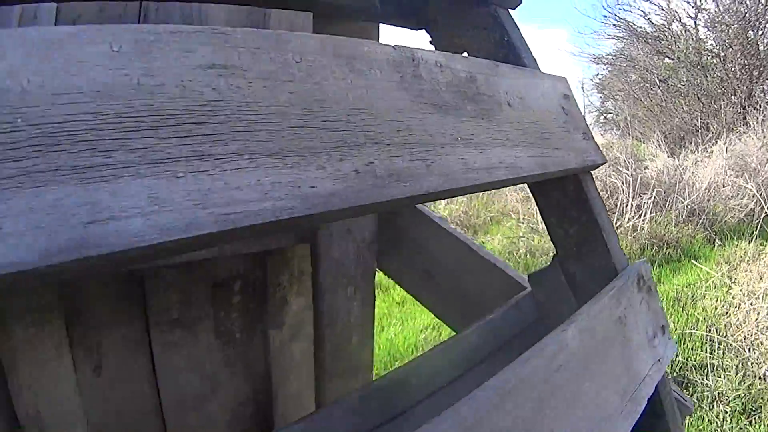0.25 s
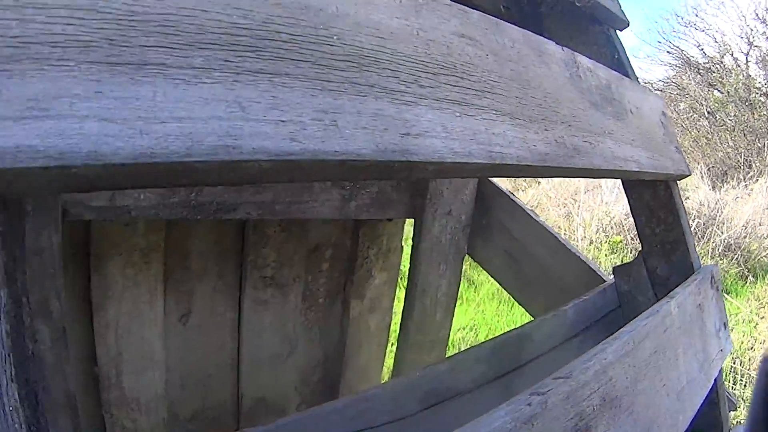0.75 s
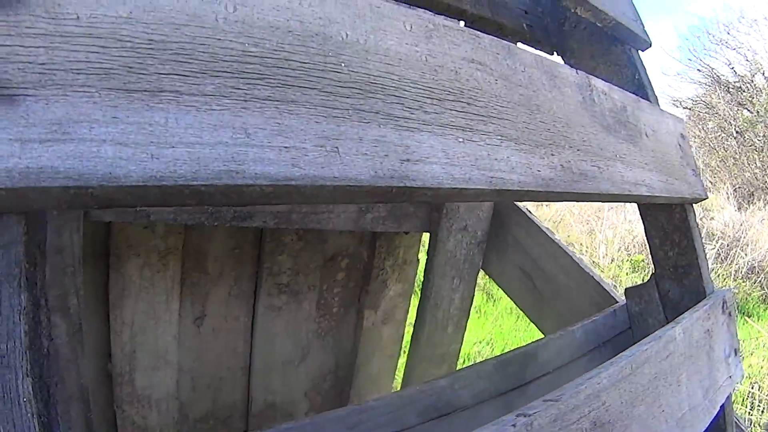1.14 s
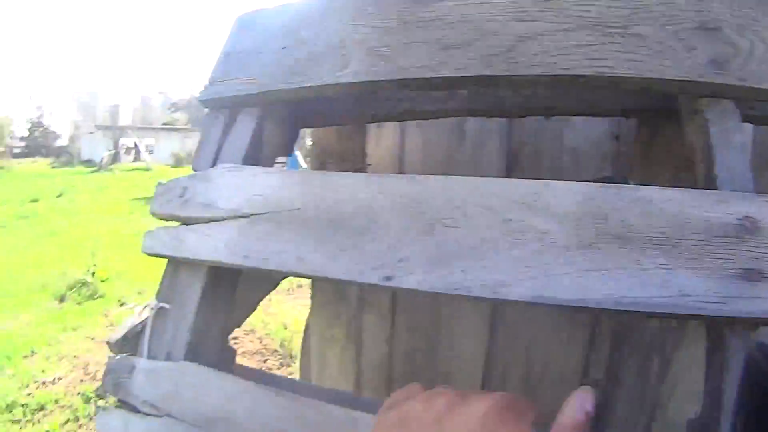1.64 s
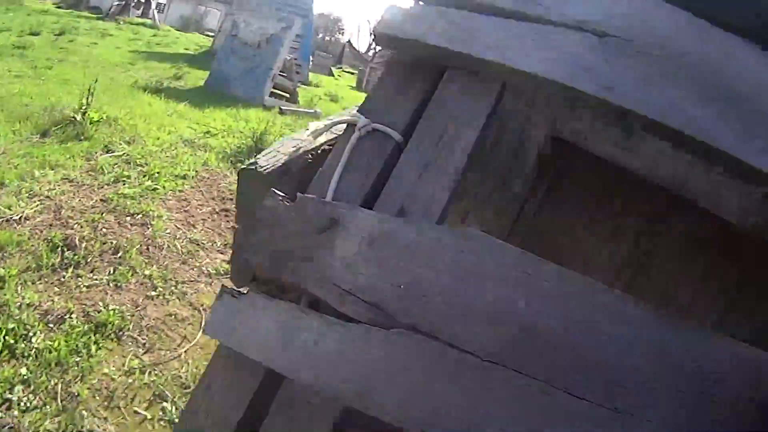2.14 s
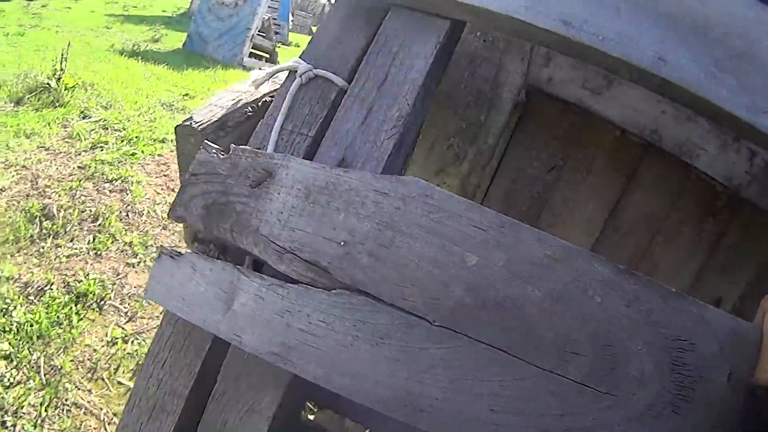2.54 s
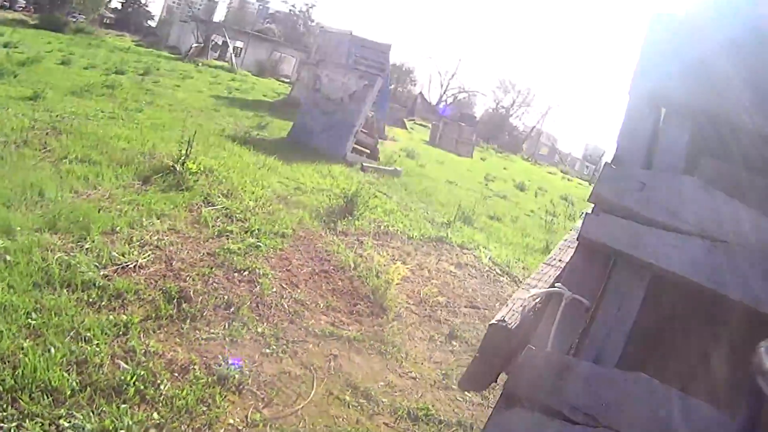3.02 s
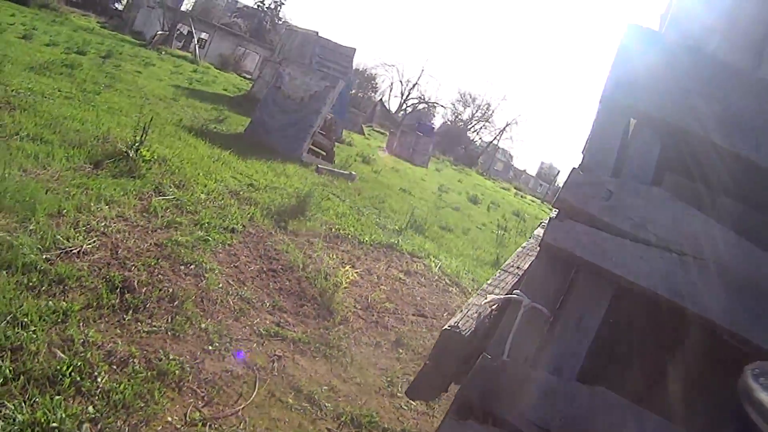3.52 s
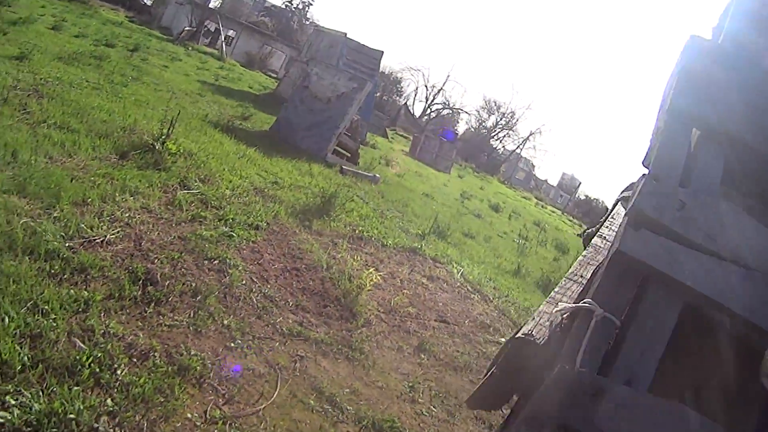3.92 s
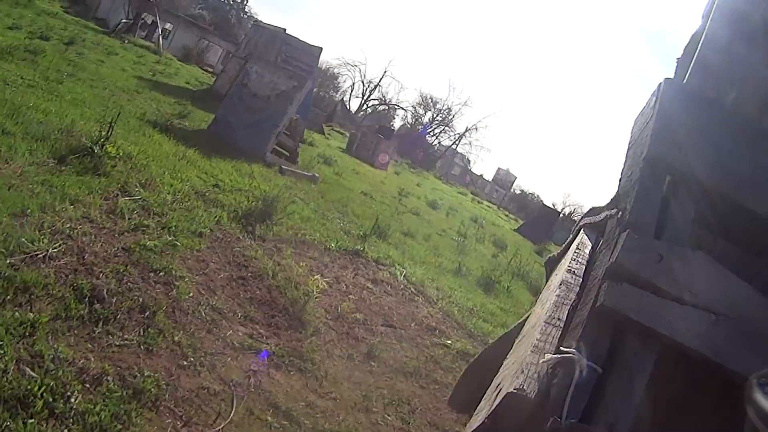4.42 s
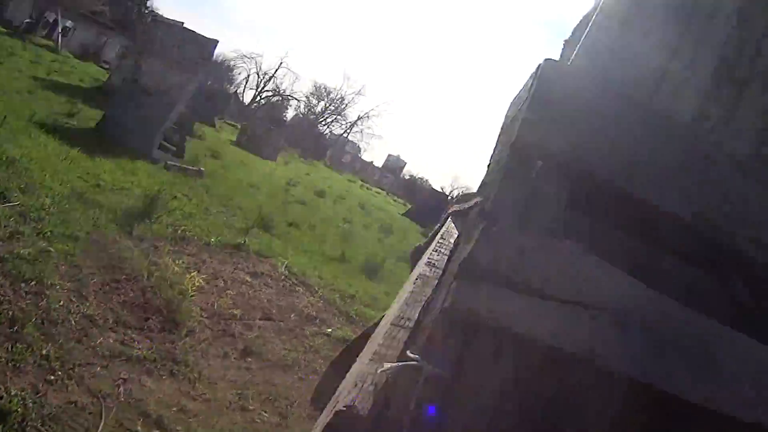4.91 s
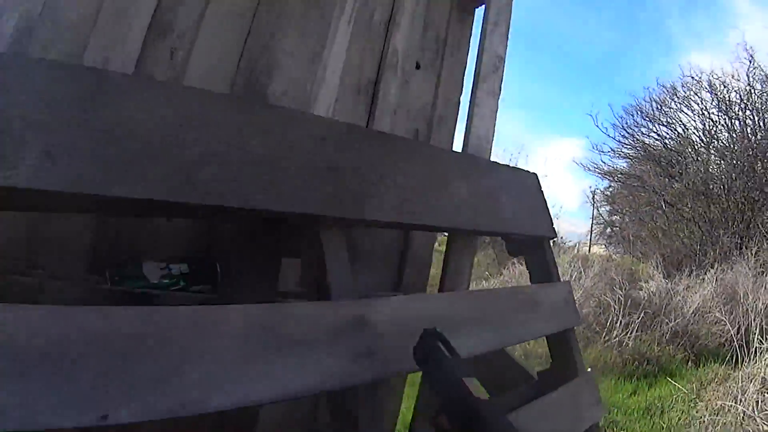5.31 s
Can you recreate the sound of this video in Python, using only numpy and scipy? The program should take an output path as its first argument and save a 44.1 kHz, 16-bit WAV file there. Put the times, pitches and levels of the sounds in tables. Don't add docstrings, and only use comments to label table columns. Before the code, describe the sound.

Muffled bumps, dull thumps and sharp little ticks on an outdoor field, then three snapping airsoft shots with clacking gun mechanics.

```python
import sys
import numpy as np
from scipy import signal
from scipy.io import wavfile
from scipy.ndimage import uniform_filter1d

SR = 44100
rng = np.random.default_rng(int(sys.argv[2]) if len(sys.argv) > 2 else 0)


def wav_out(sig):
    wavfile.write(sys.argv[1], SR, np.round(np.clip(np.atleast_2d(sig).T, -1, 1) * 32767).astype(np.int16))


def makeup_ratio(level_db):
    decades = np.asarray(level_db, float) / 20
    return 10 ** decades


N = 244975


def evened(x):
    return x / np.sqrt(np.mean(x ** 2) + 1e-20)


def add(mix, s, sound):
    part = mix[..., round(s * SR):][..., :sound.shape[-1]]
    part += sound[..., :part.shape[-1]]


def ports(common, opposed):
    return np.array([common + opposed, common - opposed])


def swell(t, rise_s):
    u = t / rise_s
    return u * np.exp(1 - u)


def flutter(ms, depth_db):
    span = round(ms * SR / 1000)
    wobble = uniform_filter1d(rng.standard_normal(N), span, mode="wrap")
    wobble = uniform_filter1d(wobble, span, mode="wrap")
    return makeup_ratio(depth_db * evened(wobble))


def resonate(x, hz, width):
    turn = np.exp(2j * np.pi * np.cumsum(hz) / SR)
    r = np.exp(-np.pi * width / SR)
    return 2 * (turn * signal.lfilter([1 - r], [1, -r], x / turn)).real


def noise(points, patchy_db):
    hz = np.fft.rfftfreq(1024, 1 / SR)
    a, b, patches = rng.standard_normal((N // 256 + 5, 513, 3)).T
    patches = uniform_filter1d(patches, size=12, axis=0)
    patches = evened(uniform_filter1d(patches, size=10, axis=1))
    f, db = np.transpose(points)
    level = np.interp(np.log(hz + 1), np.log(f + 1), db, -120, -120)[:, None] + patchy_db * patches
    return evened(signal.istft((a + 1j * b) * makeup_ratio(level), nperseg=1024, noverlap=768)[1][:N])


# pitch in Hz, width in Hz, level in dB.
WALL = [
    [(1543, 31, -6.5), (1638, 97, 5)],
    [(3330, 384, 19), (2930, 390, 11.5)],
    [(5144, 580, 27.5), (6050, 1400, 24), (7190, 410, 10), (4530, 1100, 0)],
]


def wall(x, group):
    t = np.arange(1200) / SR
    ring = sum(makeup_ratio(db) * np.exp(-np.pi * width * t) * np.sin(2 * np.pi * hz * t)
               for hz, width, db in WALL[group])
    ring *= 1 - np.exp(-t / 0.000084)
    return signal.oaconvolve(x, ring / abs(ring).max())[:N]


def crackle(count, ms):
    burst = rng.standard_normal(count) * np.exp(-np.arange(count) / (ms * SR / 1000))
    return 1.9 * burst / np.linalg.norm(burst) + 0.61 * np.eye(1, count)[0]


def through_wall(drive):
    bare = makeup_ratio(-21) * np.diff(drive[2], prepend=0)
    return sum(wall(d, group) for group, d in enumerate(drive)) + bare


# pitch in Hz, level in dB per Hz.
HISS = [(410, -12), (700, -1), (1500, 1), (2140, -4), (3850, -5), (5200, -6), (10500, -10.5), (11000, -8),
        (14300, -45), (22000, -120)]
# pitch in Hz, level in dB per Hz.
OPPOSED_HISS = [(12, -62), (20, -29), (61, -31), (90, -61), (227, -10), (406, -7), (706, -9), (1020, -11.5),
                (1480, -12), (11000, -33.5), (14300, -70), (22000, -120)]


def hiss():
    return ports(makeup_ratio(-59) * noise(HISS, patchy_db=1.0), makeup_ratio(-53) * noise(OPPOSED_HISS, patchy_db=2.5))


# time in seconds, level in dB.
WIND = [(0.0, -47), (0.31, -42), (0.74, -42.5), (1.16, -50.5), (1.37, -46), (1.56, -41.5), (1.84, -45.5),
        (2.46, -40.5), (2.81, -43.5), (3.32, -41.5), (3.55, -45), (3.79, -43), (3.94, -37.5), (4.05, -47),
        (4.27, -45.5), (5.01, -44), (5.22, -49), (5.55, -51)]
# pitch in Hz, level in dB per Hz.
RUMBLE = [(76, -52), (130, -6), (175, -4), (228, 1.5), (270, -0.5), (330, -12), (420, -20.5), (600, -26.5),
          (900, -50), (1500, -120)]
# pitch in Hz, level in dB per Hz.
DEEP = [(12, -57), (20, -27), (38, -18), (58, -18), (86, -3.5), (140, -10.5), (180, -40), (310, -120)]


def wind():
    lid_db = np.interp(np.arange(N) / SR, *np.transpose(WIND))
    lid = makeup_ratio(lid_db) * noise(RUMBLE, patchy_db=1.2) * flutter(ms=21, depth_db=0.8)
    deep = ports(noise(DEEP, patchy_db=1.5), 0.16 * noise(DEEP, patchy_db=5.5))
    return ports(lid, 0.12 * lid) + makeup_ratio(-50) * flutter(ms=130, depth_db=2.0) * deep


# time in seconds, gear rustle in dB, cloth and grass over gear in dB.
MOVES = [(0, -70, 5), (0.129, -55.5, -3), (.43, -54.5, -4.5), (.66, -58.5, -7.5), (.82, -71, -6),
         (1.36, -75, 3), (1.46, -55, -4), (1.73, -57, -9.5), (2.13, -46.5, -5), (2.36, -52, -14.5),
         (2.84, -59, -0.5), (3.1, -50.5, -5), (3.352, -56.5, -3), (3.75, -65, -14), (3.92, -56.5, -8),
         (4.06, -60.5, -6.5), (4.28, -49.5, -4), (4.6, -66.5, -7.5)]
# time in seconds, pitch in Hz.
GEAR_HZ = [(0, 1520), (2.1, 1690), (2.3, 1710), (2.62, 1790), (2.8, 1400), (3.3, 1590), (3.6, 1670),
           (4.5, 1636), (5.55, 1540)]


def rustle():
    t = np.arange(N) / SR
    s, *columns = np.transpose(MOVES)
    gear_db, over_db = (np.interp(t, s, c) for c in columns)
    cloth_db = gear_db + over_db + 2 * np.maximum(t - s[-1], 0)
    bright_db = -62 + 0.96 * (cloth_db + 59.5)
    gear_hz = np.interp(t, *np.transpose(GEAR_HZ)) * flutter(ms=55, depth_db=0.13)

    grains_per_s = 700
    grains = makeup_ratio(1.9 * np.minimum(rng.exponential(1, N), 5)) * (rng.random(N) < grains_per_s / SR)
    drive = evened(grains * rng.standard_normal(N)) * 0.52 + rng.standard_normal(N)

    bright = resonate(drive, np.full(N, 7800.), width=1080)
    bright = makeup_ratio(bright_db - 5.0) * evened(resonate(bright, np.full(N, 8200.), width=61000))
    cloth = 0.73 * evened(wall(drive, 2)) + 0.45 * evened(wall(drive, 1))
    cloth = evened(cloth + 0.81 * evened(resonate(drive, np.full(N, 5300.), width=480)))
    gear = evened(resonate(resonate(drive, gear_hz, width=198), gear_hz, width=9500))
    gear = evened(gear + 0.76 * evened(wall(drive, 0)))

    air = makeup_ratio(gear_db) * gear * flutter(ms=14.4, depth_db=2.0)
    return air + (makeup_ratio(cloth_db) * cloth + bright) * flutter(ms=11.6, depth_db=2.5)


# start in seconds, level in dB, 1 kHz share in dB, 1.8 kHz share in dB.
TAPS = [(.007, -48, 2, -12), (.263, -47.5, 8, 3), (.313, -43, 6, -7), (.421, -37, -6, -20),
        (.734, -45.5, -4, -15), (1.045, -58.5, -8, -2), (1.544, -50, 3, -8), (1.83, -36.5, 1.5, -24),
        (2.356, -48, 7, -2), (2.447, -45, -12, -18), (2.591, -37, -21, -34), (2.739, -46, -6, -21),
        (3.028, -33, 1, -18), (3.926, -38.5, -2, -23), (4.643, -49.5, -10, -8), (4.739, -44, -0.5, -13),
        (4.84, -44.5, -16, -18), (4.9, -41.5, -6, -20), (5.238, -39.5, -14, -33), (5.479, -53.5, 7, -7),
        (3.196, -27.5, -18, -14), (3.72, -29, -11, -20), (4.439, -29.5, -13, -16)]
# start in seconds, level in dB, low ring in Hz,
# 1 kHz share in dB, 1.8 kHz share in dB.
KNOCKS = [(.281, -26, 330, 1, -36), (.2845, -17, 380, -17, -20), (0.294, -28.5, 504, -13, -24),
          (.3437, -23, 412, -2.5, -14.5), (0.352, -25, 354, -5, -27), (0.363, -26, 432, -16, -36),
          (0.376, -32, 366, -6, -41), (0.633, -33.5, 390, -3.5, -36), (1.491, -34, 397, 10, -16),
          (1.496, -23, 379, -7, -10), (1.505, -32, 520, 2, -14), (1.759, -34.5, 607, -4, -9),
          (2.203, -27.5, 468, -6, -8.5), (2.297, -17, 535, -1, -12), (2.303, -35, 570, -19, -36),
          (2.777, -31.5, 643, 4, -3), (3.0245, -26, 407, -15, -26), (3.313, -35, 414, -5, -28),
          (3.378, -28.5, 470, -12, -32), (3.387, -34, 356, -31, -36), (3.883, -26.5, 593, -0.5, -24),
          (3.89, -38, 443, 3.5, -3), (5.15, -33, 357, -15, -17)]
# pitch in Hz, common level in dB, opposed level in dB, opposed lag in radians.
BASE = [(547, -6.5, -6, 0.74), (424, -12.5, 0.5, 1.6)]
MOUNT = [
    [(673, -8, -21, 1.2), (848, -9.5, -8, 1.4), (1068, -11.5, -13, 1.6)],
    [(1780, 7.5, -0.5, 1.1), (1520, 0.5, -12, 1.4), (1460, -9, -8, 1.4), (2280, -53, -15, 1.4)],
    [(3300, 1.5, -2, 1.2), (2516, 0.5, 8, 0.87), (2970, -3.5, 6, 1.6)],
]


def knocks():
    out = np.zeros((2, N))
    t = np.arange(3000) / SR
    taps = [(s, db, 378, *shares) for s, db, *shares in TAPS]
    for s, db, low_hz, *shares in KNOCKS + taps:
        shares = [*shares, -9 + 0.64 * shares[1]]
        base = [(low_hz, -.5, -3, 1.9), *BASE]
        for share_db, modes in zip([0, *shares], [base, *MOUNT]):
            for hz, common_db, opposed_db, lag in modes:
                detune, lift, turn, late, long = rng.standard_normal(5)
                ring_s = 0.0033 * np.exp(0.16 * long) * (500 / hz) ** 0.21
                phase = 2 * np.pi * hz * (1 + 0.023 * detune) * t
                ring = 2.66 * (1 - np.exp(-t / 0.0013)) * np.exp(-t / ring_s)
                ring *= makeup_ratio(db + share_db + 0.81 * lift)
                opposed = makeup_ratio(opposed_db) * np.sin(phase - lag + 0.87 * turn)
                both = ports(makeup_ratio(common_db) * np.sin(phase), opposed)
                delay_s = 0.000705 * abs(late) + 0.001573 * np.tanh(hz / 1800)
                add(out, s + delay_s, ring * both)
        u = t / 0.0026
        jolt = makeup_ratio(db - 14.0) * u * (1 - u / 2) * np.exp(1 - u)
        crack = resonate(rng.standard_normal((2, len(t))), np.full(len(t), 900.), width=1100)
        crack *= u * np.exp(-u / 1.3)
        crack_db = db - 6.0 + 0.44 * shares[0]
        add(out, s, ports(-jolt, 0.6 * jolt) + makeup_ratio(crack_db) * ports(crack[0], 1.2 * crack[1]))
    return out


# start in seconds, pitch in
# Hz, level in dB, swell in ms.
RINGS = [(.007, 550, -46, 3.4), (.145, 530, -39.5, 2.4), (.181, 438, -39, 2.1), (.263, 2040, -38, 1.6),
         (.313, 1050, -35.5, 3.8), (.316, 1600, -43, 2.9), (.345, 630, -29, 1.8), (.383, 1710, -54, 5),
         (.64, 478, -40.5, 4), (0.737, 1100, -53, 3.5), (1.044, 1620, -46.5, 2.7), (1.425, 1496, -45, 2.8),
         (1.541, 1670, -39, 2.7), (1.544, 1075, -34, 2.9), (1.758, 876, -40, 1.7), (1.76, 1758, -37, 3),
         (2.076, 1230, -44.5, 2.8), (2.297, 1060, -35, 1.5), (2.298, 2130, -26, 0.96),
         (2.304, 4330, -51, 4.3), (2.357, 1310, -34, 1.4), (2.358, 1960, -46, 2.8), (2.446, 570, -54, 2.6),
         (2.736, 1150, -44, 1.1), (2.776, 860, -42, 1.8), (2.778, 386, -30, 2.5), (3.027, 1760, -31.5, 2.2),
         (3.302, 1700, -37.5, 1.9), (3.312, 740, -44, 2.3), (3.378, 1185, -46, 2.8), (3.879, 366, -28, 3.3),
         (5.15, 1125, -40.5, 2.4), (5.237, 760, -65, 2), (5.52, 1300, -56, 8.8), (.139, 2020, -32, 1.1),
         (0.289, 3330, -31, 2.15), (1.497, 3340, -38, 2), (2.203, 664, -26, 1.3), (2.36, 1070, -39.5, 3.3),
         (3.027, 531, -32, 3), (3.722, 520, -36, 3), (4.741, 420, -39, 2), (5.15, 355, -37, 3.8),
         (1.76, 663, -46, 5), (1.838, 4860, -44, 1.5), (2.079, 4980, -36.5, 1.3), (2.165, 4780, -35.5, 1.5),
         (2.2037, 1590, -19, 1.44), (3.7184, 1690, -26, 1.6), (4.4386, 1653, -25, 2.4),
         (.2822, 400, -19.5, 3.1), (.3443, 450, -12.5, 0.75), (1.962, 7900, -54, 5.7),
             (2.527, 5200, -48, 1.5), (5.32, 5300, -52, 1.5), (1.576, 5300, -46, 1.2),
             (3.7545, 5800, -40, 1.2), (0.12, 1620, -28.5, 1.9), (.139, 6100, -34, 0.7),
             (.151, 8700, -50, 1.5), (.117, 6100, -46, 1.3), (.347, 1880, -29, 1.6), (.291, 1650, -28, 1.7),
             (3.7468, 4300, -37, 1), (3.7475, 8200, -41, 1.3), (4.467, 4400, -43, 0.85),
             (3.2225, 8200, -42, 1.2)]


def rings():
    out = np.zeros((2, N))
    t = np.arange(3000) / SR
    for s, hz, db, ms in RINGS:
        phase = 2 * np.pi * hz * t
        both = ports(np.sin(phase), 0.33 * np.sin(phase - 1.4))
        add(out, s, makeup_ratio(db) * swell(t, np.clip(ms, .8, 12) / 1000) * both)
    return out


# start in seconds, level in dB, pitch in Hz.
THUMPS = [(.117, -18.5, 191), (0.129, -22, 254), (.178, -45, 251), (0.213, -27, 213), (0.237, -38, 219),
          (0.372, -21.5, 221), (1.043, -28.5, 241), (1.377, -32, 283), (1.42, -25.5, 227), (1.6, -34, 243),
          (1.666, -30.5, 184), (1.883, -31.5, 231), (2.254, -32, 279), (2.269, -30, 278),
          (2.294, -18.5, 217), (2.363, -27.5, 203), (3.351, -31, 220), (3.485, -29, 243),
          (3.824, -32.5, 286), (3.992, -31, 225), (4.119, -27, 219), (4.14, -31.5, 228),
          (4.224, -31.5, 229), (4.543, -32.5, 245), (4.741, -23, 250), (4.897, -33.5, 282),
          (5.147, -30, 256), (5.17, -35, 220), (0.071, -51, 198), (.478, -49, 215), (0.523, -34.5, 245),
          (0.759, -36, 242), (0.776, -33, 246), (0.807, -31, 228), (.86, -37, 218), (1.495, -22, 250),
          (1.56, -47, 242), (1.618, -30.5, 244), (1.642, -44, 235), (1.756, -39, 261), (1.921, -39, 229),
          (2.119, -46, 213), (2.173, -41, 231), (2.2, -44, 277), (2.396, -40, 235), (2.491, -33.5, 280),
          (2.74, -41, 187), (2.779, -39, 284), (3.568, -40.5, 279), (4.329, -37, 220), (4.502, -35, 228),
          (4.673, -34.5, 223), (4.789, -37, 278), (4.835, -44, 251), (5.231, -37.5, 265)]
# start in seconds, level in dB, pitch in Hz, #
# swell in ms, left over right in dB.
BOOMS = [(3.196, -24.5, 236, 3.1, 7.5), (3.7202, -28, 234, 2.3, 6.5), (4.4405, -23.5, 240, 2.5, 8),
         (.35, -23.5, 285, 2.8, 2), (0.3426, -15, 289, 3.3, -1), (0.582, -24.5, 238, 6.8, 3),
         (1.83, -32.5, 243, 15, 2), (2.067, -37.5, 257, 9.3, 1), (2.979, -38.5, 267, 9.2, 0),
         (3.196, -13.5, 237, 8.2, 6.5), (3.298, -26.5, 226, 4.4, 4), (3.3135, -14.5, 237, 3.8, 6.5),
         (3.3097, -20.5, 238, 4.2, 10), (3.323, -25, 229.6, 6.1, 9), (3.7206, -13, 237, 7.4, 7),
         (3.884, -33, 246, 21, -6), (4.4409, -15.5, 239.7, 8.5, 7)]


def thumps():
    out = np.zeros((2, N))
    t = np.arange(6000) / SR
    lag = np.c_[[0.22, -0.22]]
    push = makeup_ratio(-9.5) * np.sin(2 * np.pi * 140 * t) * np.exp(-t / 0.017)
    push += makeup_ratio(-30.5) * (t / 0.0046) * np.exp(1 - t / 0.0069)
    short = [(*row, 4.32, 3) for row in THUMPS]
    for s, db, hz, ms, pan_db in short + BOOMS:
        u = t / (np.clip(ms, 2, 16) / 1000)
        rise = u ** 0.85 * np.exp(.3 - 0.34 * u ** 2) + 0.22 * np.tanh(u) * np.exp(-t / 0.022)
        tone = rise * np.sin(2 * np.pi * hz * t + lag)
        octave = makeup_ratio(-29.0) * rise ** 2 * np.cos(4 * np.pi * hz * t) * np.tanh(u)
        add(out, s, -makeup_ratio(db + np.c_[[pan_db, -pan_db]] / 2) * (tone + octave + push))
    return out


# start in seconds, snap in dB,
# 1.6 kHz share in dB, 3.3 kHz share in dB.
TICKS = [(0.1148, -35, -7, -7), (0.3237, -42, -3, -6), (0.34, -26, -5, -8), (0.3655, -34.5, -10, -8),
         (0.4168, -35.5, -5, -7), (0.7303, -38.5, 3, -13), (1.5683, -40, 4.5, -6),
         (1.6582, -43, -6.5, -3.5), (1.6752, -36.5, -7, -8), (1.7859, -51, 8, -3),
         (1.8111, -36, -2.5, -3.5), (1.838, -30, -14.5, -12), (1.97, -41.5, 8, 5.5),
         (1.9832, -36, -8.5, -7), (2.078, -35, -10, 0.5), (2.164, -31.5, -10, -8), (2.183, -33, -15, -12),
         (2.2037, -36, -1, 5.5), (2.2976, -32, -4, 6.5), (2.527, -45, -15, -24), (2.7666, -39, -3.5, -3),
         (3.302, -45, -6, -14), (3.4858, -33, -13.5, -23), (3.9163, -37.5, -2.5, -7),
         (4.119, -38.5, -2.5, -7), (4.254, -33, -13, -9), (4.356, -37, -25, -11), (4.691, -42.5, -6, -8),
         (4.825, -42, -7, -8), (5.3198, -41.5, -26, -0.5)]
# start in seconds, level in dB.
MORE_TICKS = [(0.264, -48), (0.288, -34.5), (0.295, -44), (1.497, -35.5), (1.962, -36.5), (1.012, -53.5),
              (1.6282, -48.5), (2.8148, -45), (2.887, -53.5), (3.458, -62), (4.102, -44), (4.224, -54),
              (4.3037, -44), (4.331, -49), (4.34, -46), (4.5494, -52), (5.0579, -48)]


def ticks():
    drive, pings = np.zeros((3, N)), np.zeros(N)
    t = np.arange(900) / SR
    for s, db, low_db, mid_db in TICKS + [(*row, 0.5, -5) for row in MORE_TICKS]:
        hz = (5150 - 30 * (db + 44.0)) * (1 + .02 * rng.standard_normal())
        add(drive, s, makeup_ratio(db + np.c_[[low_db, mid_db, -4]]) * crackle(count=600, ms=2.4))
        add(pings, s, makeup_ratio(db - 6) * swell(t, 0.00036) * np.sin(2 * np.pi * hz * t))
    return through_wall(drive) + pings


# start in seconds, snap in dB, 1.6 kHz share in dB, 3.3 kHz share in dB, echo body
# over shimmer in dB.
SHOTS = [
    (0.1382, -34, 2, 3, -2),
    (3.1941, -21, -11.5, -9, 9),
    (3.7186, -21.5, -11, -10.5, 10.5),
    (4.4392, -24, -9.5, -5, 8),
]


def shots():
    drive, pings = np.zeros((3, N)), np.zeros(N)
    t = np.arange(SR // 2) / SR
    ping_t = t[:900]
    ping = swell(ping_t, 0.00055) * np.sin(2 * np.pi * 5250 * ping_t)
    ragged = flutter(ms=1.5, depth_db=3.5)
    thin = makeup_ratio(np.c_[[-3, -4, 0]])
    for s, db, low_db, mid_db, body_db in SHOTS:
        size = makeup_ratio(db + np.c_[[low_db, mid_db, 0]])
        add(drive, s, size * crackle(count=600, ms=1.0))
        add(pings, s, makeup_ratio(db) * ping)
        echo_db = -16.5 + 0.27 * body_db - 15.5 - 60 * t / 0.58
        echo = rng.standard_normal(len(t)) * makeup_ratio(echo_db) * (1 - np.exp(-t / 0.00075))
        add(drive, s, size * thin * echo * ragged[round(s * SR):][:len(t)])
        shimmer = resonate(echo, np.full(len(t), 7900.), width=1260)
        add(pings, s, makeup_ratio(db + 21.0 - 0.92 * body_db) * shimmer)
    return through_wall(drive) + pings


# start in seconds, level in dB, 1.6 kHz share in dB.
ACTION = [(0.155, -39, 1), (.164, -42, -5), (0.17, -45, -9), (3.2043, -31, -1), (3.210, -37, -6),
          (3.213, -44, -12), (3.2222, -29.5, -25), (3.228, -43, -16), (3.233, -44, -10), (3.254, -43, -4),
          (3.2947, -44, -17), (3.7268, -31, 2), (3.734, -40, -10), (3.737, -35, -19), (3.7468, -32, -25),
          (3.747, -35, -25), (3.753, -45, -13), (3.758, -47, -15), (3.766, -41, -19), (3.776, -37, -4),
          (3.782, -41, -17), (3.788, -44, -2), (4.447, -31, 6.5), (4.4575, -37, -3), (4.46, -47, -18),
          (4.467, -31.5, -20), (4.478, -41, -13), (4.481, -43, -15), (4.487, -49, -12), (4.495, -43, 4),
          (4.499, -48, -4), (4.5244, -42, -17), (4.54, -48, -4)]


def clacks():
    drive, pings = np.zeros((3, N)), np.zeros(N)
    t = np.arange(900) / SR
    for s, db, low_db in ACTION:
        hz = 5150 * (1 + 0.048 * rng.standard_normal())
        add(drive, s, makeup_ratio(db + np.c_[[low_db - 4, -9, 0]]) * crackle(count=600, ms=2.0))
        add(pings, s, makeup_ratio(db - 5.0) * swell(t, 0.0021) * np.sin(2 * np.pi * hz * t))
    return through_wall(drive) + pings


# time in seconds, pitch in Hz, level in dB.
MOAN = [
    (3.94, 255.5, -33),
    (3.974, 220.8, -45),
    (4.03, 250.1, -40),
    (4.078, 257.5, -41.5),
    (4.15, 230.3, -38),
    (4.2, 239, -47),
]


def moan():
    out = np.zeros((2, N))
    s, hz, db = np.transpose(MOAN)
    t = np.arange(s[0], s[-1], 1 / SR)
    note = np.sin(2 * np.pi * np.cumsum(np.interp(t, s, hz)) / SR)
    note *= makeup_ratio(np.interp(t, s, db) + 6.5) * signal.windows.tukey(len(t), .3)
    add(out, s[0], note * makeup_ratio(np.c_[[1.5, -1.5]]))
    return out


# start in seconds, length in seconds, first pitch in Hz,
# last pitch in Hz, level in dB.
WHIZZ = (4.166, .032, 5800, 5250, -47)


def whizz():
    out = np.zeros(N)
    s, length, from_hz, to_hz, db = WHIZZ
    glide = to_hz + (from_hz - to_hz) * np.linspace(1, 0, round(length * SR)) ** 2
    add(out, s, makeup_ratio(db) * np.hanning(len(glide)) * np.sin(2 * np.pi * np.cumsum(glide) / SR))
    return out


def scene():
    shaken = hiss() + wind() + knocks() + rings() + thumps() + moan()
    air = rustle() + ticks() + shots() + clacks() + whizz()
    air = air + 0.86 * air ** 2 - 3.7 * air ** 3
    late = np.roll(air, shift=7)
    return ports(air, 0.32 * np.diff(late, prepend=0)) + shaken


def low_pass(x):
    return signal.sosfilt(signal.butter(12, 11940, fs=SR, output="sos"), x)


def record(dry):
    lowpass = signal.firwin(511, 11020, window=("kaiser", 9), fs=SR)
    low = signal.oaconvolve(dry, lowpass[None], "same")
    top = dry - low
    power = abs(uniform_filter1d(top ** 2, size=90))
    sharp = power / (power + makeup_ratio(-56) ** 2)
    return low_pass(low + makeup_ratio(-15) * sharp * top)


dry = scene()
out = record(dry)
wav_out(out)
```